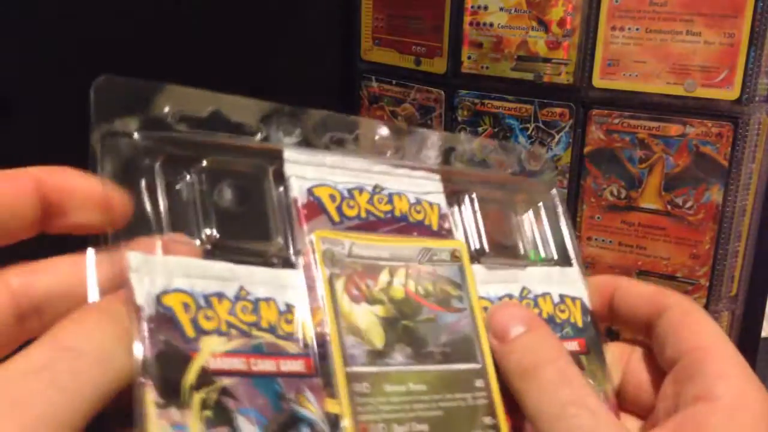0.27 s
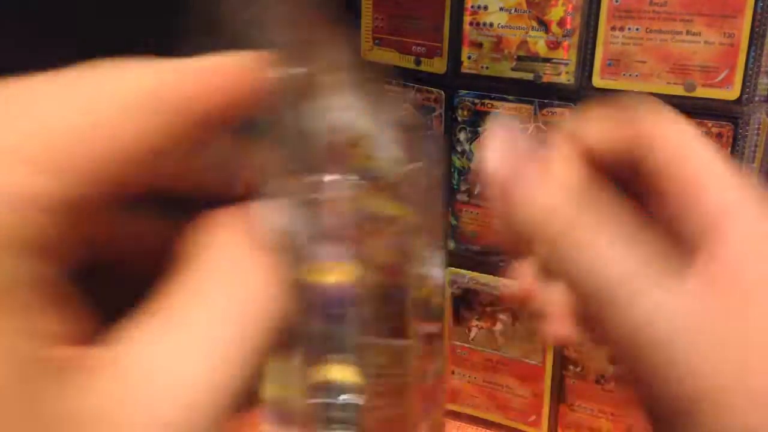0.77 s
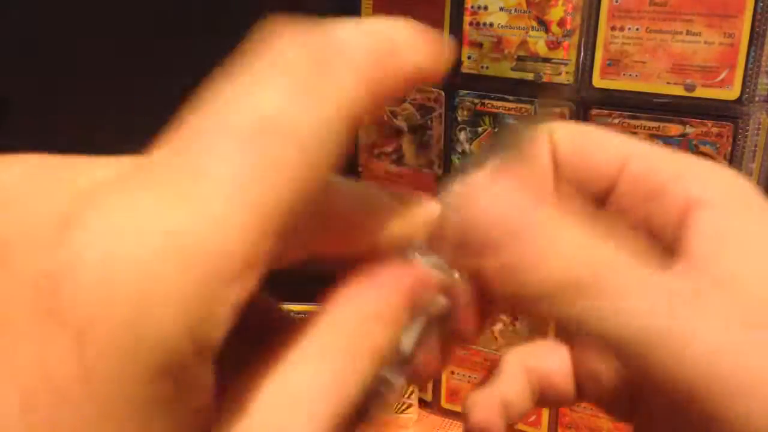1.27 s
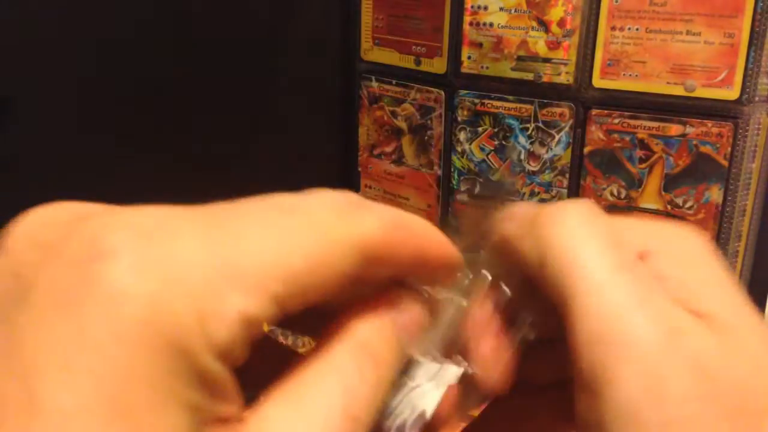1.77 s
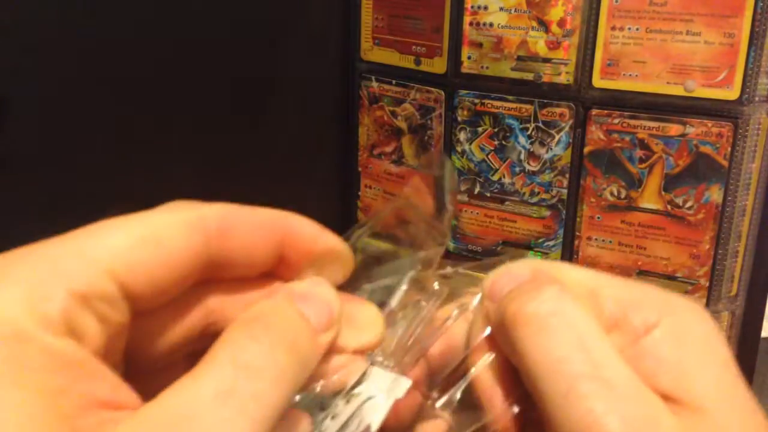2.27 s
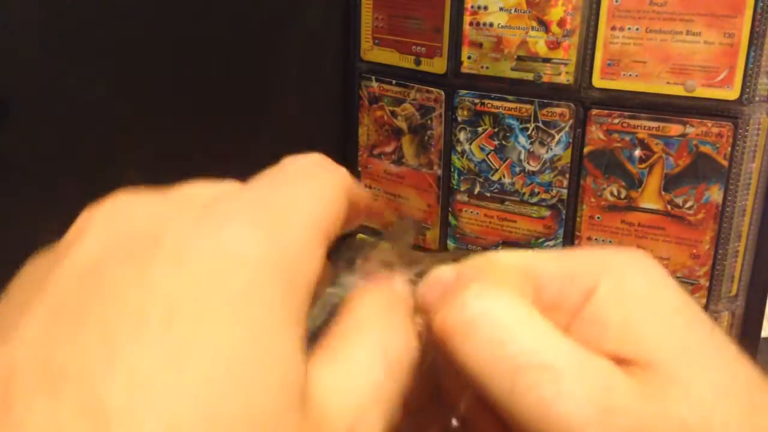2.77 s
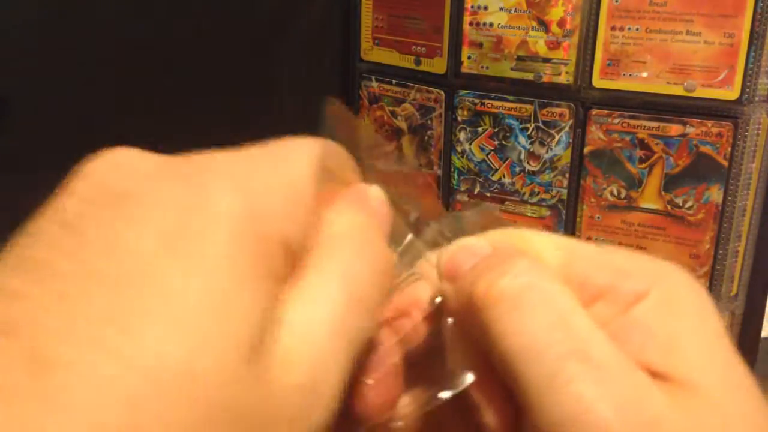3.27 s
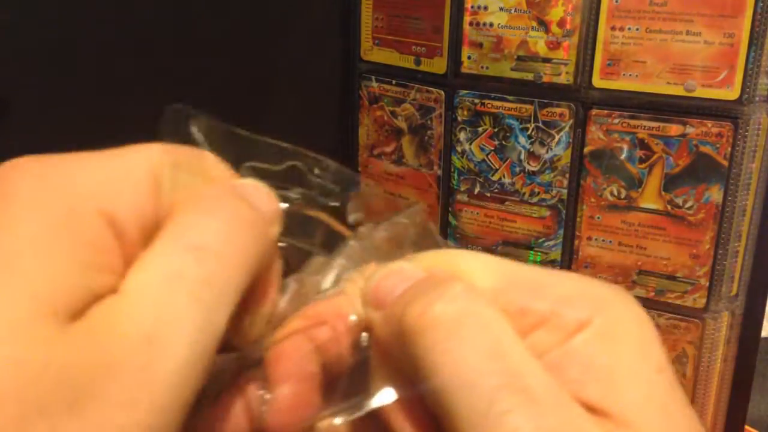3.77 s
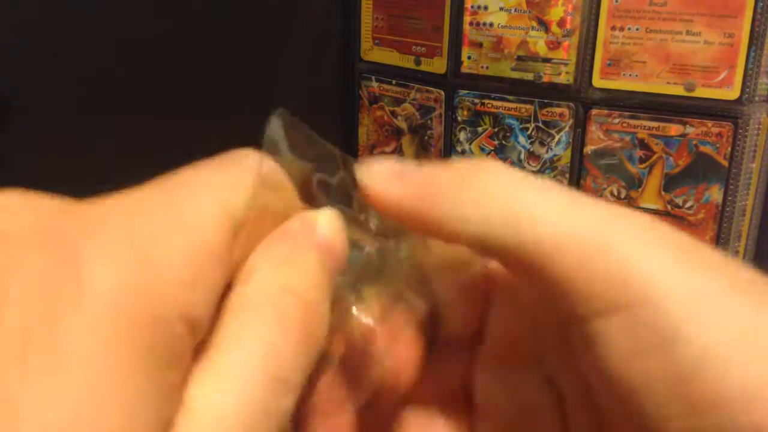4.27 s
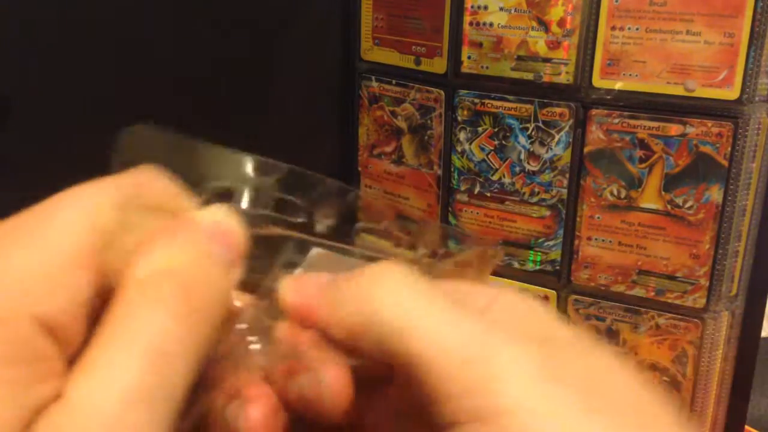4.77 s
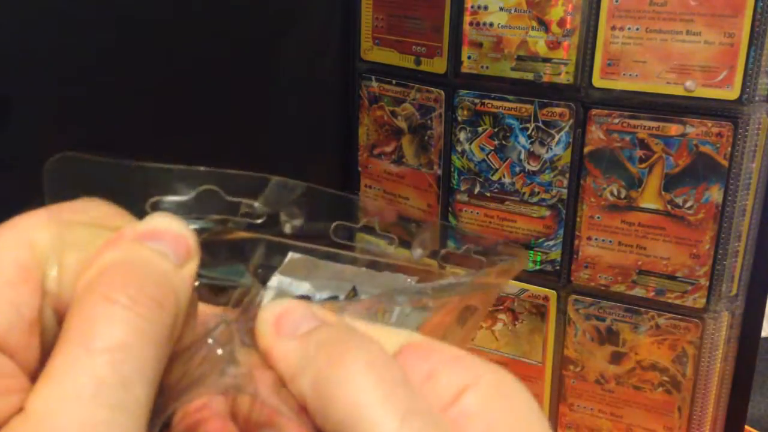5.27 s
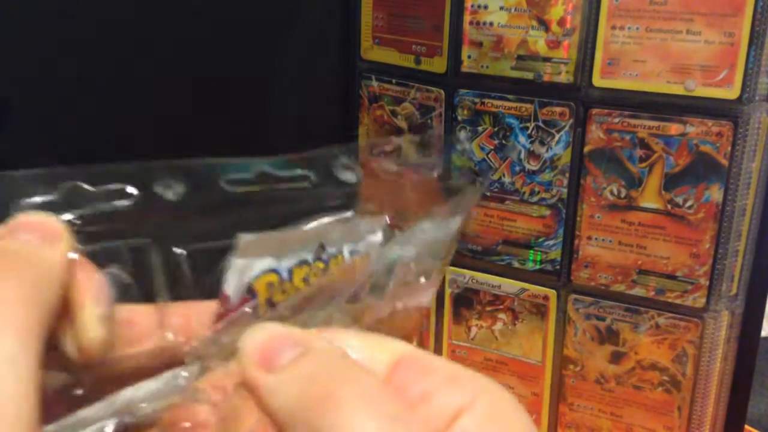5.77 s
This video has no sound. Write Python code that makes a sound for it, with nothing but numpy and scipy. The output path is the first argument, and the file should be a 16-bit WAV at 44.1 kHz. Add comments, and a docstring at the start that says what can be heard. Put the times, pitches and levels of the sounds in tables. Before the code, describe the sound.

Stiff clear plastic packaging snaps and crackles sharply in close-up as hands bend and peel it open, with light crinkling over faint hiss.

```python
"""Over a faint hiss and light crinkling, sharp snaps break out: hands peel a stiff plastic blister off its card.
Each snap is a kick plus decaying noise, coloured by a buckling facet, the whole shell and the crease.
The glued seam lets go in trains of stick-slip ticks; fingers rub and crinkle the plastic, the card bumps
in damped sine swings and the grip rumbles. A small room answers, and a fast limiter holds down loud cracks."""
import sys
import numpy as np
from scipy import signal
from scipy.fft import rfft, irfft
from scipy.io import wavfile
from scipy.ndimage import uniform_filter1d, minimum_filter1d

SR = 44100
rng = np.random.default_rng(int(sys.argv[2]) if len(sys.argv) > 2 else 0)


def to_wav(sig):
    """Store sig (one row per channel, or 1-D mono) as 16-bit WAV at the path in sys.argv[1].

    Samples outside -1..1 are clipped; the rate is SR.
    """
    pcm = np.clip(np.atleast_2d(sig), -1, 1) * 32767
    pcm = np.round(pcm).astype(np.int16)
    wavfile.write(sys.argv[1], SR, pcm.T)  # frames by channels


N = 264864
SIZE, TAIL = 2048, 16384  # length of a crack and of a room tail or bump, samples
FREQS = np.maximum(np.arange(SIZE // 2 + 1) * SR / SIZE, 1)  # Hz
AGE = np.arange(SIZE) / SR  # s since a crack began
TIME = np.arange(N) / SR  # s

# Facets that buckle, levels before the common trim:
# t/s, energy level/dB, facet f/Hz, whole-shell level/dB and crease level/dB relative to the facet
SNAPS = [(0.203, -10, 1680, 18.5, -0.5), (0.2562, -21, 2440, -18, -24), (0.2782, 4, 3830, -2, -8),
         (0.2837, -7, 2310, 0, -21), (0.4138, -10, 2500, 7.5, -19), (0.4187, -13, 2500, 7.5, -11.5),
         (0.4231, -8.5, 5300, 11, -4), (0.498, -17.5, 2560, 2, -32), (0.514, -12.5, 2600, 0.5, -34),
         (0.523, -12, 2440, 6, -33), (0.5658, -22, 2270, 7, -33), (0.6592, -21, 1300, -16, -6.5),
         (0.7502, -7, 2390, 5.5, -7.5), (0.7534, -14.5, 2530, 5, -24), (0.8981, -19.5, 2200, -9, -19),
         (0.908, -23.5, 2480, -28, -2), (0.9179, -4, 2800, -30, 1), (0.9285, -14, 8000, -7, 5),
         (0.9496, -8, 4670, -30, -9), (0.9718, -17.5, 1900, -3, -6), (1.177, -12.5, 2180, -3, 8),
         (1.314, -14, 1410, -34, -10), (1.405, -16.5, 3270, -28, 2), (1.433, -25.5, 8400, -4, -12),
         (1.533, -9.5, 2530, 0, -1), (1.5444, 0, 2240, -14.5, -19), (1.5497, -0.5, 2140, -29, -30),
         (1.6057, -20.5, 2630, -9, -32), (1.667, -13.5, 2400, -7.5, -35), (1.7336, -14.5, 1760, -25, -40),
         (1.75, -17, 1700, -9, -42), (1.8684, -11.5, 3480, 1.5, -1.5), (1.904, -17.5, 1300, 26, 1.5),
         (1.9826, 3, 3420, -1, -13), (2.108, -27.5, 7240, -28, -15.5), (2.1613, -3.5, 1880, -1.5, -44.5),
         (2.2918, -5.5, 1880, -7, -18.5), (2.3762, 2, 2030, 0, -25), (2.3766, 2.5, 720, -3.5, -39),
         (2.3837, -1, 8000, -17, -25), (2.476, -22, 6000, -10, 3), (2.517, -9, 2100, -28, -3),
         (2.7114, -20.5, 1294, 21.5, 0), (2.745, -22.5, 3220, -23, -17), (2.8377, -22.5, 2650, -5, -36),
         (3.107, -21.5, 2220, -7, -7.5), (3.1832, -21, 3050, 2.5, -37), (3.2663, 2, 4760, -38, -30),
         (3.4518, -21.5, 3230, -7, -27), (3.5694, -13.5, 1940, -19, -39), (3.6328, -15.5, 2570, -9, -44),
         (3.6864, -14, 2900, -9.5, -27), (3.715, -18, 4120, -20, -14), (3.7212, -16, 7100, -24, 0),
         (3.749, 6.5, 3260, -7.5, -7), (3.8164, -8, 3200, -15, -10), (3.9775, -21, 3150, -16, -19),
         (4.0312, -17.5, 8000, -19, 12), (4.061, -20, 3540, -23, -16), (4.098, -16, 4000, -27, -12),
         (4.1527, 1.5, 5300, -13.5, -28), (4.213, -10.5, 8000, -8, 7), (4.3553, -25, 3030, -27, -18),
         (4.4765, -16.5, 8000, -7, -14), (4.486, -18, 1560, -14, -6.5), (4.6225, 3.5, 2180, -32, -9),
         (4.6403, -3.5, 1590, -21.5, 0.5), (4.7078, 5, 1520, -13, -3), (4.7129, -3.5, 1740, -21, -46),
         (5.1447, -16.5, 8100, -32, -24), (5.3527, -25.5, 7710, -13, -32), (5.4389, -13.5, 3050, 5, 1.5),
         (5.67, 11.5, 2530, -0.5, -0.5), (5.6814, -1.5, 2960, -23, 3), (5.7133, -8.5, 2630, -0.5, -10),
         (5.8329, -14.5, 1910, -2, -9.5), (5.9775, -20.5, 2470, 15, -23)]


def snaps(trim_db=0.15, own_share=0.76, places=16):
    """Each facet pops over with its own pitch and ring; its reflections cycle through a set of places."""
    out, tails = np.zeros(N), room(places)
    for k, (s, db, hz, body_db, crease_db) in enumerate(SNAPS):
        gain = facet(hz, body_db, crease_db)
        size = undb(db + trim_db)
        add(out, s, size * crack(gain, ring_time(db, hz, body_db)))
        # the walls hear the shell from all sides, which evens out the facet's colour
        to_walls = unit(causal(gain ** own_share))
        add(out, s, size * through(tails[k % len(tails)], to_walls))
    return out


RING_T60_S, RING_HZ = 0.01, 2800  # base ring of a 0 dB snap on a lone facet of this pitch
# a facet this much louder, or higher, is tauter and rings half as long
RING_HALVES_DB, RING_HALVES_OCTAVES = 31, 4
SHELL_RING = 0.48  # power law: the more the whole shell joins in, the longer the ring


def ring_time(db, hz, body_db):
    """T60 of a snap's fast waves in s: short for a taut facet, longer when the whole shell shakes."""
    halvings = db / RING_HALVES_DB + np.log2(hz / RING_HZ) / RING_HALVES_OCTAVES
    return RING_T60_S * 0.5 ** halvings * (1 + undb(body_db)) ** SHELL_RING


# Resonances of the shell: f/Hz, width/Hz, lift level/dB
SHELL_MODES = [(496, 290, 5.5), (1545, 130, 6), (2216, 265, 7.5), (3140, 370, 1.5), (4130, 290, 1)]
# How well the shell radiates: f/Hz, level/dB
SHELL_RADIATION = [(40, -19.5), (250, -14.5), (800, -9), (1500, -3), (2700, -3.5), (4500, 3.5),
                   (6700, -2.5), (10500, -5), (15000, -11)]


def facet(hz, body_db, crease_db, q=2.23, body_hz=1200, bass_hz=130, crease_hz=2500):
    """Gain of one buckle: the facet rings, the whole shell knocks below, the crease ticks above."""
    ring = 1 / (1 + (q * (FREQS / hz - hz / FREQS)) ** 2)
    body_lowpass = 1 + np.square(FREQS / body_hz) ** 2
    body_highpass = 1 + np.square(bass_hz / FREQS) ** 2
    body = undb(body_db) ** 2 / body_lowpass / body_highpass
    crease = undb(crease_db) ** 2 / (1 + np.square(crease_hz / FREQS) ** 2)
    return np.sqrt(ring + body + crease) * colour(SHELL_RADIATION) * lifts(SHELL_MODES)


def crack(gain, t60, scatter=1.61, damp_hz=3000, low_ring=1.72):
    """A sudden kick, then bending waves that bounce around the sheet; the slow ones last longer."""
    noise = rng.standard_normal(SIZE)
    slow = signal.sosfilt(signal.butter(1, damp_hz, fs=SR, output="sos"), noise)
    fast = noise - slow
    waves = scatter * unit(slow * fade(AGE, t60 * low_ring) + fast * fade(AGE, t60))
    waves[0] += 1  # the kick
    polarity = rng.choice([-1, 1])
    return polarity * unit(through(waves, causal(gain)))


# Resonances of the taut flap at the seam: f/Hz, width/Hz, lift level/dB
FLAP_MODES = [(1400, 320, 13.5), (2075, 130, 8), (3424, 280, 10)]
# Pulls on the glued seam: start t/s, end t/s, first slip rate/Hz, last slip rate/Hz,
# first and last energy level/dB of a slip after a typical hold at full force
PULLS = [(4.735, 4.862, 161.6, 131.4, -13, -22.5), (4.906, 5.095, 138, 56, -12, -13.5),
         (5.105, 5.268, 190, 240, -24.5, -27.5)]
HOLD_S, PULL_ATTACK_S = 0.012, 0.034  # typical hold of the glue; time to take up the slack
SLIP_T60_S, SLIP_UNEVEN = 0.01, 0.1  # ring of a slip's fast waves; timing scatter as a share of the hold


def seam(scatter_db=1.3, slack=0.34, hold_power=0.56):
    """Glue holds and lets go; every slip plucks the same taut flap, the harder the longer it held."""
    out = np.zeros(N)
    flap = facet(hz=2880, body_db=-8.5, crease_db=-5.5) * lifts(FLAP_MODES)
    for start, end, first_rate, last_rate, first_db, last_db in PULLS:
        s = start
        for late, size in rng.standard_normal((60, 2)):
            hold = 1 / np.interp(s, [start, end], [first_rate, last_rate])
            tension = np.interp(s - start, [0, PULL_ATTACK_S], [slack, 1])
            force = tension * (hold / HOLD_S) ** hold_power
            db = np.interp(s, [start, end], [first_db, last_db]) + scatter_db * size
            slip = force * undb(db) * crack(flap, SLIP_T60_S)
            if s < end:
                add(out, s + SLIP_UNEVEN * hold * late, slip)
            s += hold
    return out


# The backing flexes and bumps the fingers: t/s, f/Hz, level/dB before the soft onset, t60/s
BUMPS = [(1.541, 159, -34.5, 0.056), (1.638, 120, -40, 0.05), (1.902, 240, -24, 0.017),
         (1.954, 112, -44, 0.091), (1.983, 214, -47.5, 0.18), (2.376, 181, -22, 0.029),
         (2.711, 182, -34.5, 0.05), (5.663, 47, -9.5, 0.021)]


def bumps(rise_s=0.002):
    """The card swings a few cycles as a sine, damped by the hands."""
    out, t = np.zeros(N), np.arange(TAIL) / SR
    for s, hz, db, t60 in BUMPS:
        onset = 1 - np.exp(-t / rise_s)
        add(out, s, undb(db) * np.sin(2 * np.pi * hz * t) * fade(t, t60) * onset)
    return out


# A finger or the card drags over the plastic: start t/s, end t/s, drag level/dB before the texture
SCUFFS = [(0.496, 0.534, -62), (0.699, 0.793, -51.5), (1.181, 1.219, -43), (1.612, 1.73, -53.5),
          (1.839, 1.9, -53), (2.916, 3.15, -66), (3.143, 3.27, -55.5), (3.374, 3.441, -54),
          (3.594, 3.607, -46.5), (3.947, 4.1, -61), (4.449, 4.527, -57), (4.556, 4.64, -50),
          (5.312, 5.36, -59), (5.615, 5.646, -43)]
# Colour of the sliding hiss: f/Hz, level/dB
RUB_COLOUR = [(300, -18), (900, -9), (1700, -1.5), (4500, -1.5), (8000, -9), (15000, -16.5)]
# creaking before a 0 dB snap: length, drag level, dB gained per dB of the snap
STRAIN_S, STRAIN_DB, STRAIN_SHARE = 0.028, -51.5, 0.73


def fingers(tick_db=1, slide_db=-8, rest_db=-70, fidget_db=4, fidgets_per_s=11):
    """Skin catches and slides: crinkles over a soft hiss, swelling as strain builds before each snap."""
    drag = busy() * undb(rest_db + fidget_db * walk(fidgets_per_s))
    for start, end, db in SCUFFS:
        length = max(int((end - start) * SR), 2)
        add(drag, start, undb(db) * signal.windows.tukey(length, 0.5))
    for s, db, *_ in SNAPS:
        swell = np.linspace(0, 1, int(STRAIN_S * SR))
        add(drag, s - STRAIN_S, undb(STRAIN_DB + STRAIN_SHARE * db) * swell)
    rub = unit(causal(colour(RUB_COLOUR) * lifts(SHELL_MODES)))
    slide = through(rng.standard_normal(N), rub)
    return drag * (undb(tick_db) * crinkle() + undb(slide_db) * slide)


def crinkle(ticks_per_s=140, spread_db=10.0, t60=0.022):
    """A stream of tiny buckles on small facets, uneven in size and spacing, scaled to unit spread."""
    waits, sizes, pitches = rng.standard_normal((2000, 3)).T
    times = np.cumsum(np.exp(0.5 * waits) / ticks_per_s)  # ticks_per_s follows the median wait
    facets = [facet(hz, body_db=0.5, crease_db=-31.0) for hz in (1570, 2160, 3050, 4600)]
    rings = [crack(gain, t60) for gain in facets for _ in range(4)]  # four variants of each
    shuffled = np.argsort(pitches)
    out = np.zeros(N)
    for s, size, which in zip(times, sizes, shuffled):
        add(out, s, undb(spread_db * size) * rings[which % len(rings)])
    return out / np.std(out)


def ticks(per_s=12, tick_db=-34, spread_db=5.0, hz=3800, pitch_spread=0.49, t60=0.013):
    """Small facets click over now and then, louder when the grip is busier."""
    out = np.zeros(N)
    for k, (late, size, pitch) in enumerate(rng.standard_normal((100, 3))):
        s = abs(k + 1 + 0.5 * late) / per_s
        gain = facet(hz * np.exp(pitch_spread * pitch), body_db=-5, crease_db=-15)
        add(out, s, busy(s) * undb(tick_db + spread_db * size) * crack(gain, t60))
    return out


# How busily the hands shift their hold: t/s, rumble level/dB before trim and waver
GRIP = [(0.0, -80), (0.12, -69), (0.42, -71), (1.42, -74), (1.85, -73), (1.95, -86), (2.35, -71),
        (2.49, -103), (2.71, -77), (2.87, -76.5), (3.78, -73.5), (3.93, -73), (4.5, -76.5), (4.68, -82),
        (4.9, -69), (5.43, -73.5), (5.63, -71.5), (6.0, -99)]
# Colour of the rumble: f/Hz, level/dB
GRIP_COLOUR = [(25, -21.5), (90, -6), (360, 2.5), (650, -12.5), (3000, -60)]
WAVER_DB = 2.8


def grip(trim_db=1.0, shifts_per_s=16):
    """A dull rumble of low-coloured noise that comes and goes as the hands shift their hold."""
    rumble = through(rng.standard_normal(N), unit(causal(colour(GRIP_COLOUR))))
    return rumble * undb(curve(GRIP) + trim_db + WAVER_DB * walk(shifts_per_s))


# grip level of an ordinary hold; dB of small plastic noises per dB of grip
GRIP_USUAL_DB, FIDGET_SHARE = -77.5, 0.2


def busy(t=TIME):
    """Gain of the small plastic noises: they follow the grip."""
    return undb(FIDGET_SHARE * (curve(GRIP, t) - GRIP_USUAL_DB))


# Decay of the room by band: f/Hz, t60/s
ROOM_T60 = [(400, 0.12), (2300, 0.27), (6000, 0.26), (14000, .22)]
# Colour of the reflections: f/Hz, level/dB
ROOM_COLOUR = [(100, 6), (1000, 2), (2200, 0), (7000, -2), (15000, -5)]


def room(count, room_db=-13.0, build_s=0.0012):
    """Reflections of a small furnished room, dying band by band; one tail for each place of the source."""
    t = np.arange(TAIL) / SR
    hz = np.maximum(np.arange(TAIL // 2 + 1) * SR / TAIL, 1)
    noise = rfft(rng.standard_normal((count, TAIL))) * colour(ROOM_COLOUR, hz)
    centres, t60s = np.transpose(ROOM_T60)
    # overlapping triangular bands on a log-frequency axis
    bands = [np.interp(np.log(hz), np.log(centres), own) for own in np.eye(len(centres))]
    tails = sum(irfft(noise * band) * fade(t, t60) for band, t60 in zip(bands, t60s))
    build = 1 - np.exp(-(t / build_s) ** 2)
    return [undb(room_db) * unit(tail * build) for tail in tails]


# Colour of the background hiss: f/Hz, level/dB
HISS_COLOUR = [(30, -5.5), (350, -12), (1000, -7.5), (2200, -14), (15000, -13.5)]


def hiss(level_db=-75):
    """A faint steady background of coloured noise."""
    noise = through(rng.standard_normal(N), unit(causal(colour(HISS_COLOUR))))
    return undb(level_db) * noise


def undb(db):
    """Decibels to gain."""
    return 10 ** (np.asarray(db) / 20)


def colour(points, hz=FREQS):
    """Gain of (Hz, dB) points joined on a log-frequency axis."""
    f, db = np.transpose(points)
    return undb(np.interp(np.log(hz), np.log(f), db))


def lifts(modes):
    """Gain of a few damped resonances."""
    return undb(sum(db / (1 + (2 * (FREQS - hz) / width) ** 2) for hz, width, db in modes))


def curve(rows, t=TIME, axis=1):
    """One column of a table, joined by straight lines in time."""
    columns = np.transpose(rows)
    return np.interp(t, columns[0], columns[axis])


def walk(rate):
    """Random levels held 1 / rate s and smoothed twice; spread near 1."""
    hold = int(SR / rate)
    steps = np.repeat(rng.standard_normal(N // hold + 1), hold)
    return np.sqrt(2) * uniform_filter1d(uniform_filter1d(steps, hold), hold)[:N]


def fade(t, t60):
    """Exponential decay, 60 dB down after t60."""
    return np.exp(-np.log(1000) * t / t60)


def unit(x):
    """Scale to unit energy."""
    return x / np.sqrt(np.sum(x ** 2))


def add(out, s, x):
    """Mix x into out from time s on."""
    i = max(int(s * SR), 0)
    out[i:i + len(x)] += x[:max(N - i, 0)]


def causal(gain):
    """The promptest (minimum-phase) impulse response that has this gain over frequency."""
    cepstrum = irfft(np.log(gain + 1e-9))
    cepstrum[1:SIZE // 2] *= 2
    cepstrum[SIZE // 2 + 1:] = 0
    return irfft(np.exp(rfft(cepstrum)))


def through(x, response):
    """Pass x through an impulse response."""
    return signal.fftconvolve(x, response)[:len(x)]


def scene():
    """The pack close up, the room behind it, and a faint steady hiss."""
    small_sounds = fingers() + ticks() + grip() + bumps() + seam()
    echo = through(small_sounds, room(count=1)[0])
    mix = snaps() + small_sounds + echo + hiss()  # the snaps bring their own reflections
    return mix[None]


CEILING_DB, TOP_HZ = -7, 15600  # limiter ceiling; edge of the steep treble cut


def record(dry, size=65):
    """A look-ahead limiter, its window in samples, holds the peaks; the top is cut steeply."""
    gain = np.minimum(1, undb(CEILING_DB) / (np.abs(dry) + 1e-9))
    gain = uniform_filter1d(minimum_filter1d(gain, size), size)
    treble_cut = signal.ellip(8, 0.2, 70, TOP_HZ, fs=SR, output="sos")
    return signal.sosfilt(treble_cut, dry * gain)


dry = scene()
out = record(dry)
to_wav(out)
```